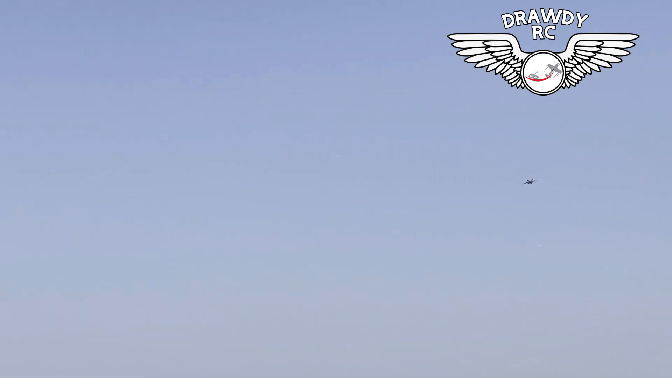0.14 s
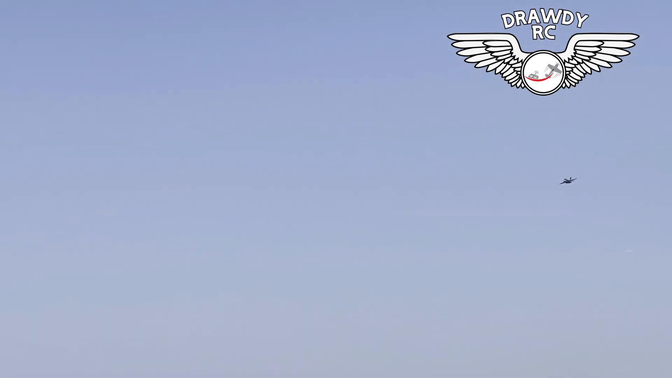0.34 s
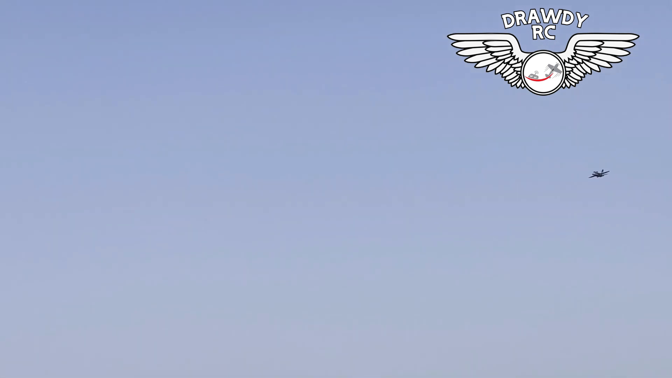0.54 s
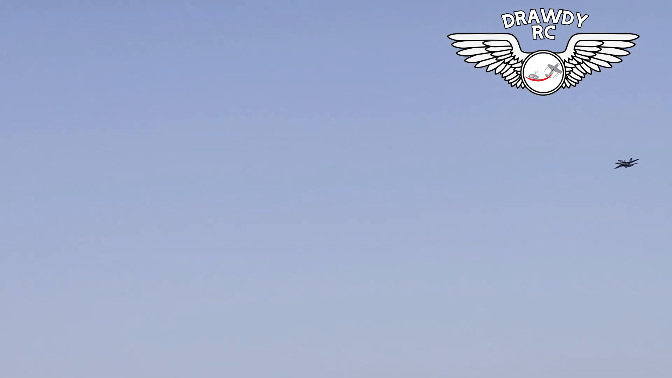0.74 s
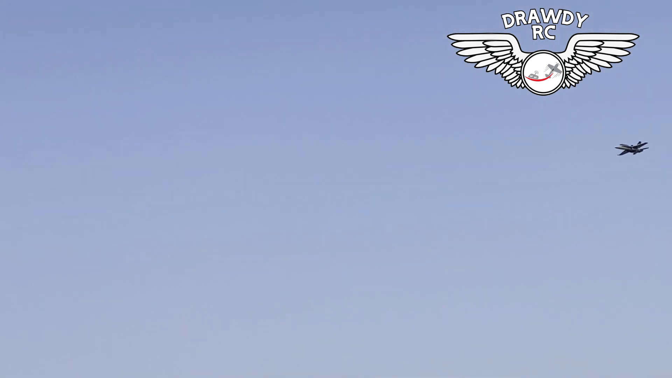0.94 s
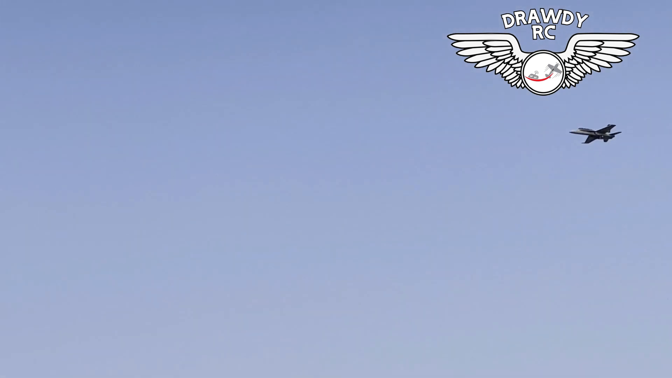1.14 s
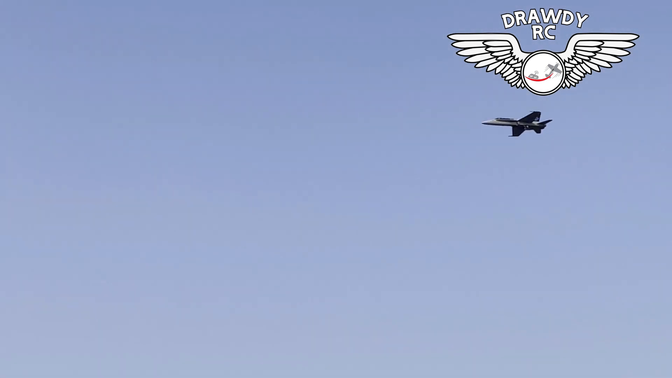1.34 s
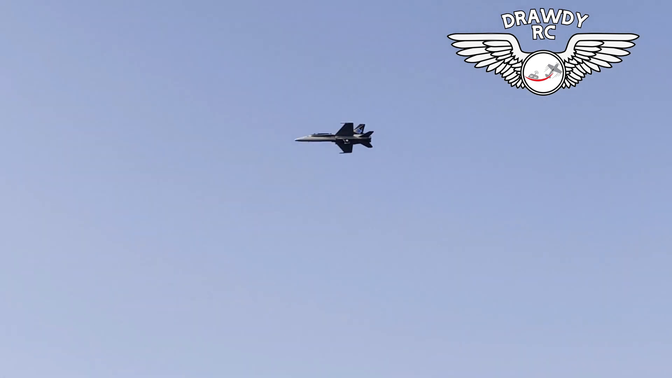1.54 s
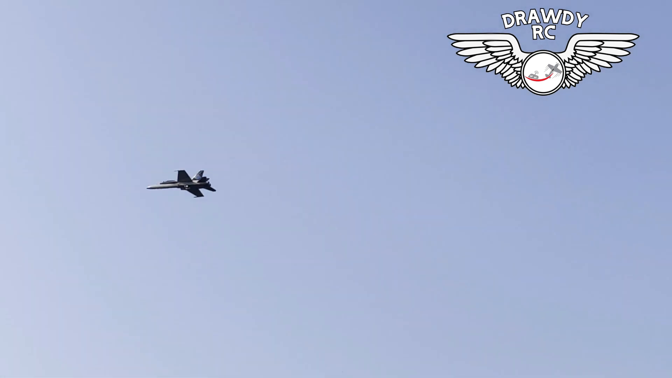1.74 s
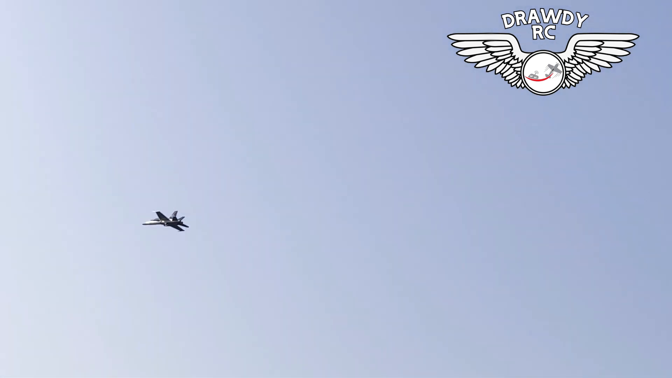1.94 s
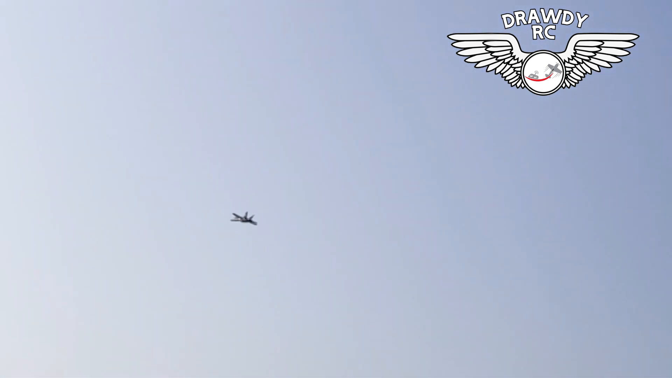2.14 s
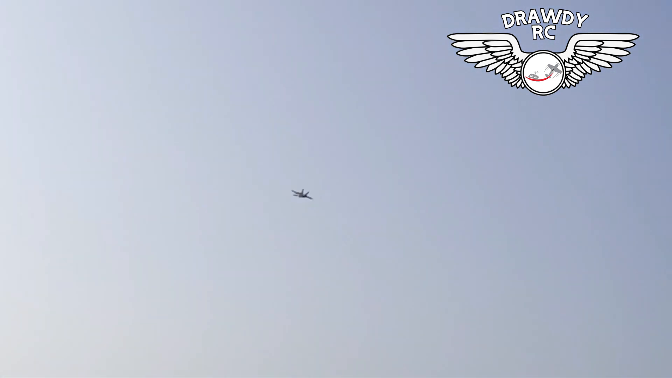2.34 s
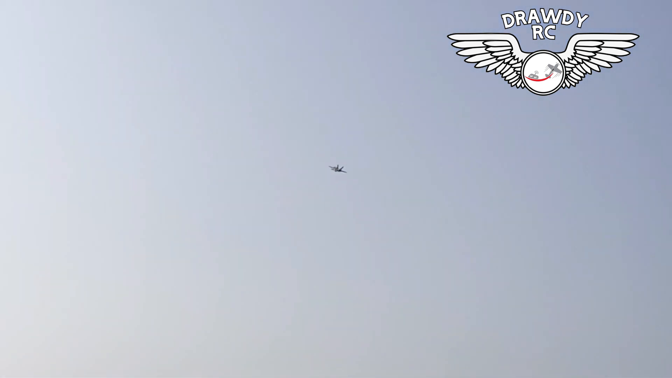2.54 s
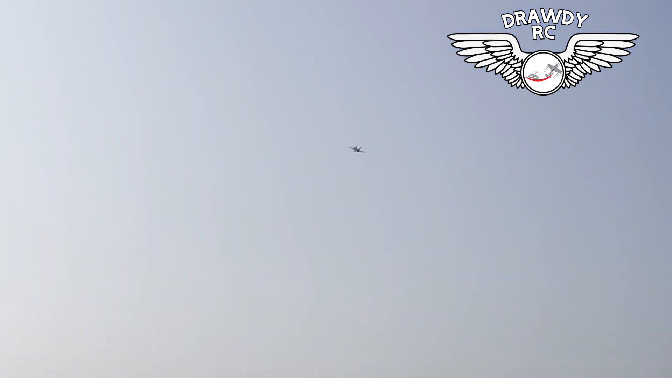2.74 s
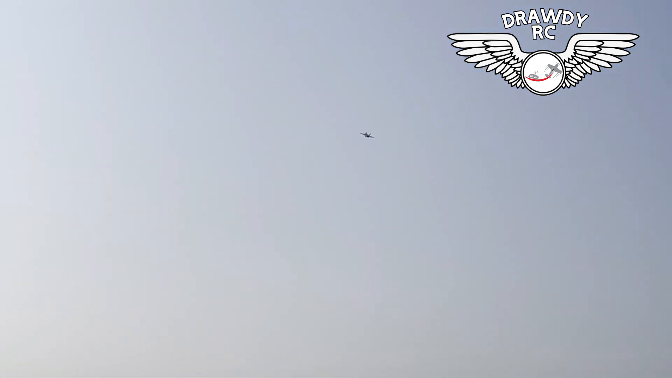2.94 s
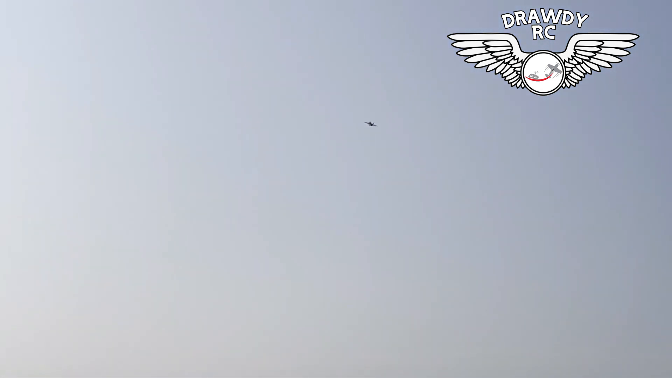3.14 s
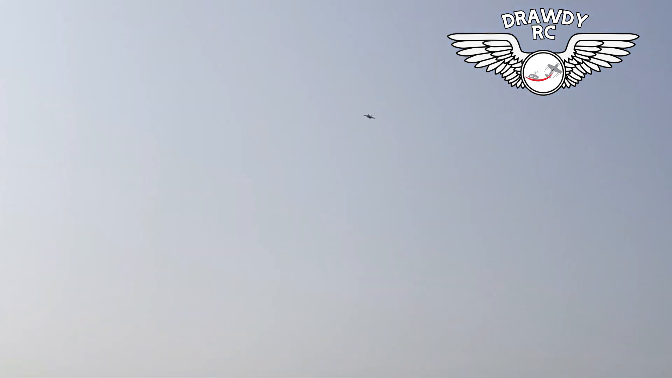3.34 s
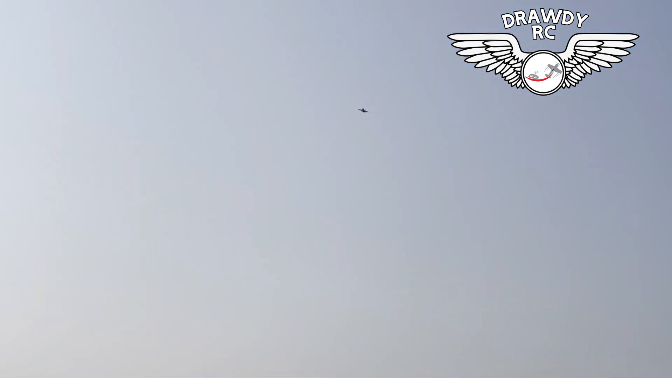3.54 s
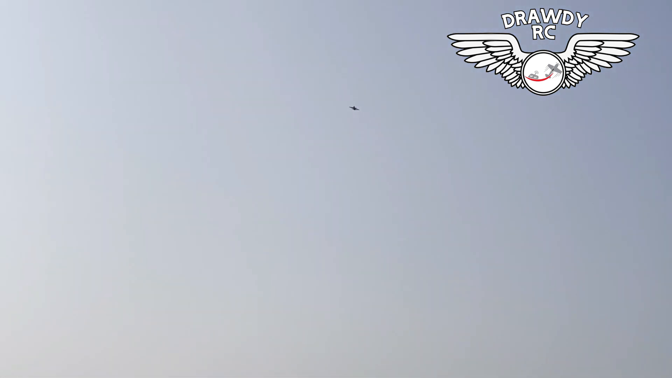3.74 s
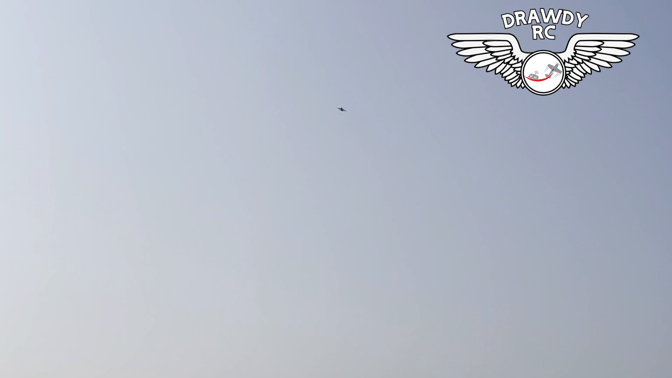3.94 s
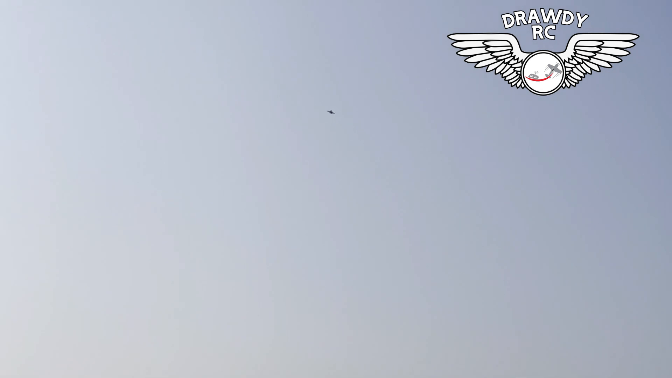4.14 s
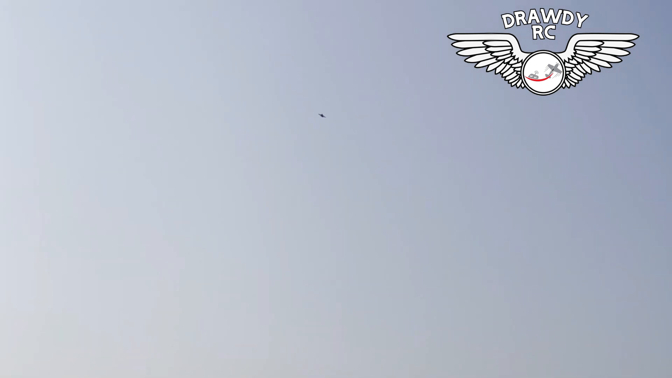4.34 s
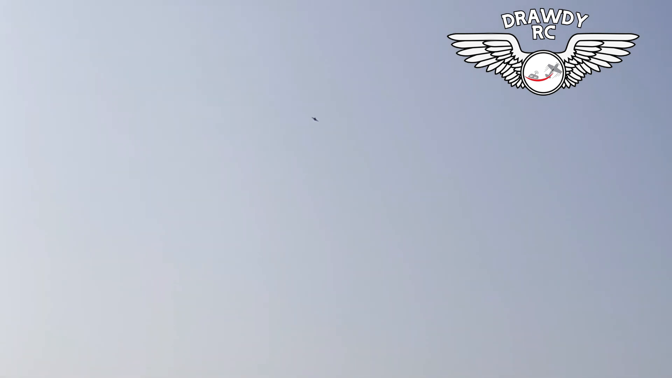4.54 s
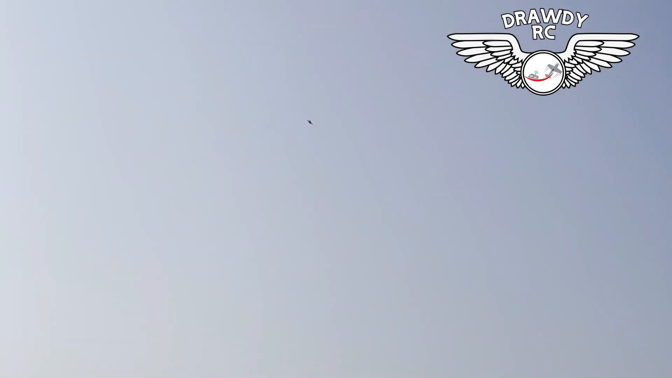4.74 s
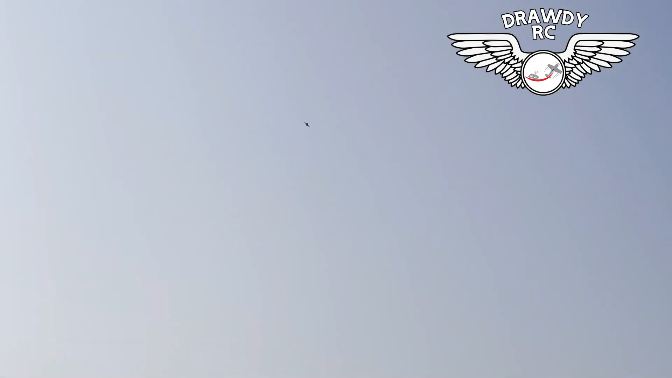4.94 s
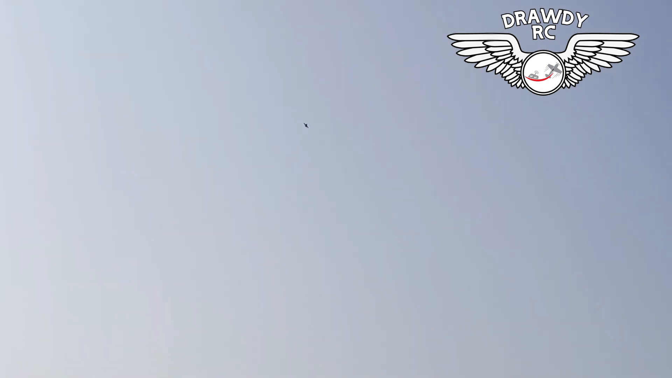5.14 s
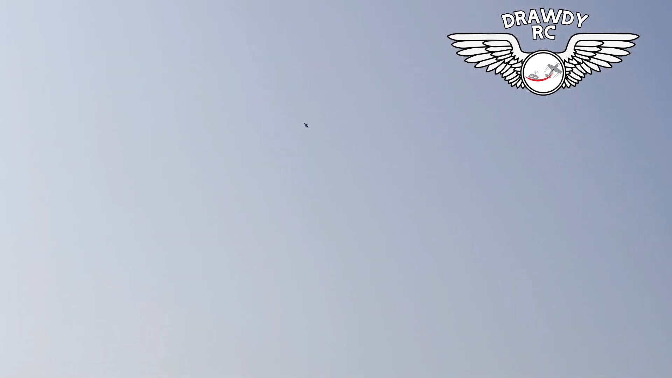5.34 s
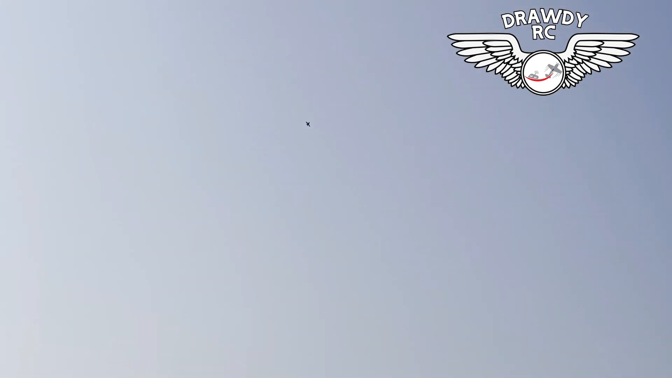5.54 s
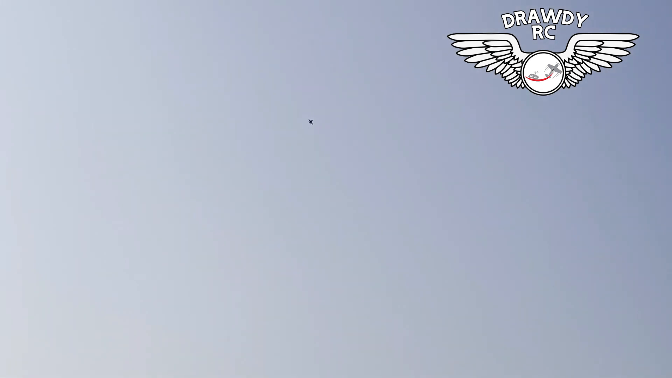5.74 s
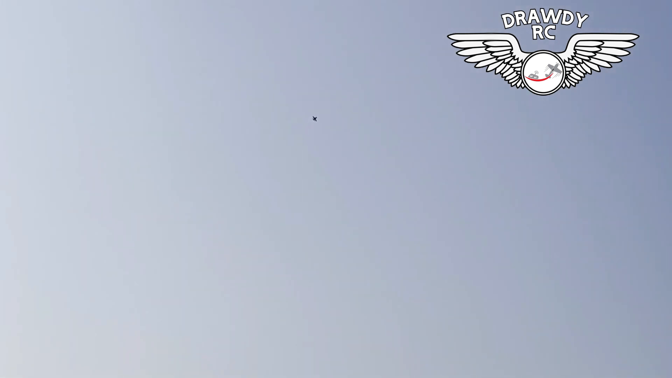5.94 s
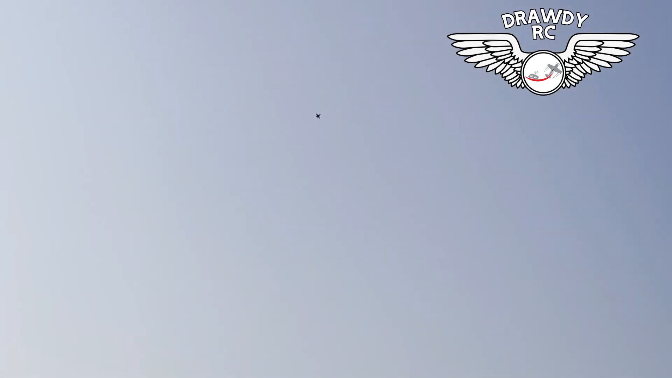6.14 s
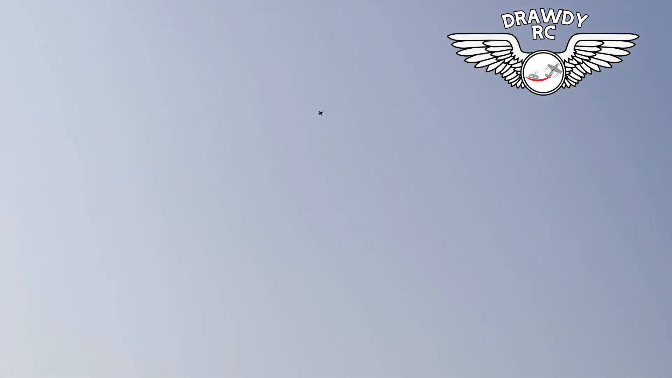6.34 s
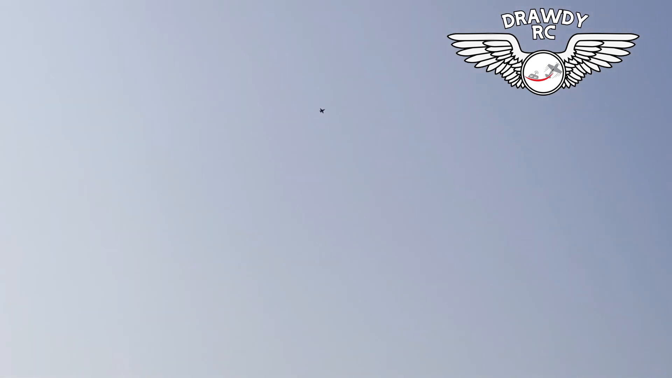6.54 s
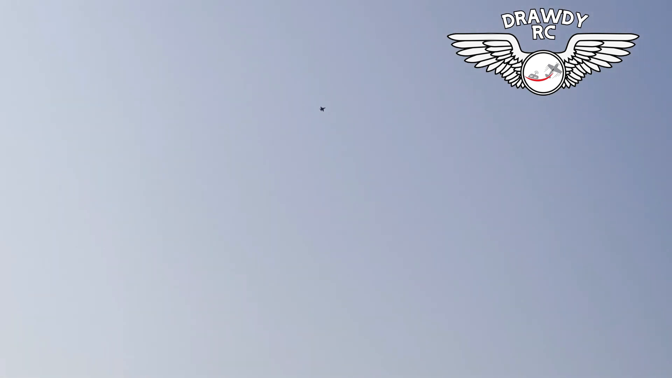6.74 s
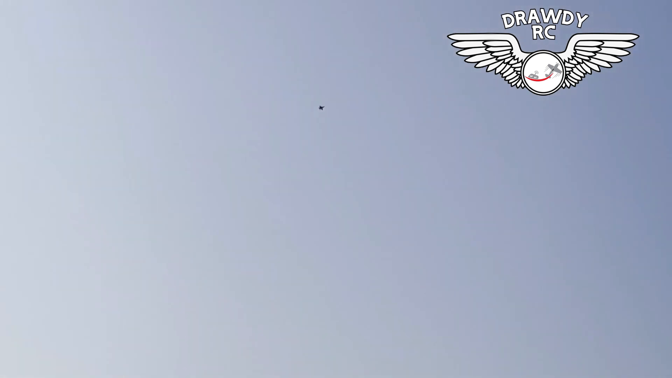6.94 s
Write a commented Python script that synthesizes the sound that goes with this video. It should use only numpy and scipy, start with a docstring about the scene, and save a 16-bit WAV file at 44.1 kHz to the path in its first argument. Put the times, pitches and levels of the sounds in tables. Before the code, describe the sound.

Outdoors on an open, breezy field, a small model jet approaches with a piercing fan whine and bright hissing rush. It passes close at about one and a half seconds, pitch sliding down, a hollow sweeping coloration from ground reflection running through it. Then it recedes, whine thin and wavering while the fan slowly winds up. Low wind thumps buffet the microphone, mostly early; a tiny bird trills twice over steady faint hiss.

```python
"""Whine and rush of a small model jet come in over windy ground, pass low and recede as the fan winds up.
Fan tones are sines and noise lines on the rotation; jet noise is shaped noise in bands. Both drop in
pitch by Doppler shift, and a delayed ground echo sweeps a comb through them.
Wind is gusted low noise. A small bird trills twice once the jet is distant: chirps falling in pitch.
Steady microphone hiss lies beneath; two close ports give the stereo phase."""
import sys
import numpy as np
from scipy import signal
from scipy.fft import rfft, irfft, next_fast_len
from scipy.io import wavfile
from scipy.ndimage import map_coordinates

SR = 44100
rng = np.random.default_rng(int(sys.argv[2]) if len(sys.argv) > 2 else 0)


def put_to_file(sound):
    """Save the sound as 16-bit audio at rate SR, in the file named by the first command-line argument."""
    columns = np.atleast_2d(sound).T  # one column per channel
    safe = np.clip(columns, -1, 1)
    whole_steps = np.round(safe * 32767)
    wavfile.write(sys.argv[1], SR, whole_steps.astype(np.int16))


N = 308259
TIME = np.arange(N) / SR
BLADE_COUNT = 12
SOUND_M_PER_S, MIC_HEIGHT_M = 343, 1.5
# straight pass at steady speed; PASS_S is when the closest point is heard
PASS_S, CLOSEST_M, SPEED_M_PER_S = 1.604, 22.34, 52.48

# fan winding up: start_s, speed_turns_per_s
FAN_SPEED = [(0, 436.5), (1.1, 436), (2.2, 435.8), (3.5, 441.7), (4, 445.1), (6, 457.4), (6.99, 468.6)]
# wavering of the distant jet: start_s, level_db
WAVER = [(0, 0), (3.2, 0), (3.6, -1.8), (3.95, -.8), (4.22, -4), (4.7, 1.3), (5.2, -2), (5.55, .2),
         (5.9, -1.8), (6.3, 1), (6.6, -1.3), (6.85, -4.5), (6.99, -4)]


def from_db(db):
    """Decibels to gain."""
    return 10 ** (np.asarray(db) / 20)


def rms_one(x):
    """Scale to unit rms."""
    return x / np.sqrt(np.mean(x ** 2) + 1e-20)


def in_time(rows):
    """Each column of a curve at every sample."""
    s, *columns = np.transpose(rows)
    return [np.interp(TIME, s, c) for c in columns]


def noise(colour, size=N):
    """Noise with a given spectrum, rms 1."""
    points, padded = np.array(colour), next_fast_len(size, True)
    hz = np.maximum(np.fft.rfftfreq(padded, 1 / SR), 1)
    gain = from_db(np.interp(np.log(hz), np.log(points[:, 0]), points[:, 1]))
    white = rng.standard_normal(padded)
    return rms_one(irfft(rfft(white) * gain, padded)[:size])


def drift(corner_hz):
    """Slow random wander, rms 1: two-pole low-passed noise at SR / 20."""
    r = np.exp(-2 * np.pi * corner_hz * 20 / SR)
    settle = 4000
    white = rng.standard_normal(N // 20 + settle + 2)
    slow = signal.lfilter([1], [1, -2 * r, r * r], white)[settle:]
    return np.interp(np.arange(N) / 20, np.arange(len(slow)), rms_one(slow))


def band(x, low_hz, high_hz, order=8):
    """Zero-phase band-pass as a difference of two low-passes, rms 1."""
    size = next_fast_len(N, True)
    hz = np.fft.rfftfreq(size, 1 / SR)
    under_low, under_high = (1 / (1 + (hz / edge) ** (2 * order)) for edge in (low_hz, high_hz))
    return rms_one(irfft(rfft(x, size) * (under_high - under_low), size)[:N])


def read_at(x, position):
    """Read a signal between its samples."""
    return map_coordinates(x, [position], order=3, mode="mirror")


def delayed(x, lag_s):
    """The signal lag_s later."""
    return read_at(x, (TIME - lag_s) * SR)


def over_ground(x, lag_s, echo):
    """Direct sound plus its weaker bounce off the field, kept near constant power."""
    return (x + echo * delayed(x, lag_s)) / np.sqrt(1 + echo ** 2)


def jet():
    """Motion sets Doppler shift; path difference sets the ground echo's lag, longest near overhead."""
    # start_s, height_m (used for the echo lag only)
    height_curve = [(0, 27.6), (.4, 22.2), (.8, 17.6), (1, 15.85), (1.3, 14.1), (1.6, 13.15), (1.95, 12.9),
                    (2.2, 13.7), (2.45, 15.2), (3, 22), (3.5, 30.2), (4, 40.2), (4.8, 58.4), (5.5, 78.3),
                    (6.2, 96.9), (6.99, 121.4)]
    distance_m, bearing_deg = flight()
    turns_per_s, = in_time(FAN_SPEED)
    height_m, = in_time(height_curve)
    mach = SPEED_M_PER_S / SOUND_M_PER_S
    blade_hz = BLADE_COUNT * turns_per_s / (1 - mach * np.cos(np.radians(bearing_deg)))
    lag_s = 2 * MIC_HEIGHT_M * height_m / distance_m / SOUND_M_PER_S
    path = blade_hz, distance_m, bearing_deg, lag_s
    return jet_noise(*path) + fan(*path)


def flight():
    """Distance (m) and angle from the nose (degrees) at which the sound now arriving left the jet."""
    mach = SPEED_M_PER_S / SOUND_M_PER_S
    along = SPEED_M_PER_S * (TIME - PASS_S) + mach * CLOSEST_M
    slant = np.sqrt(along ** 2 + (1 - mach ** 2) * CLOSEST_M ** 2)
    distance_m = (slant - mach * along) / (1 - mach ** 2)
    return distance_m, np.degrees(np.arccos(mach - along / distance_m))


def jet_noise(blade_hz, distance_m, bearing_deg, lag_s):
    """Turbulence of exhaust and fan, its pitch following the blades; moving air makes it flutter."""
    # spectrum near the closest point, shaping each band from within: pitch_hz, relative_level_db
    jet_colour = [(120, -6), (300, -5), (600, -3), (1000, 1), (1400, 0.5), (2200, 0.5), (3100, -2),
                  (4200, 1), (5200, 5), (6300, 6.5), (8000, 4), (10500, 3.5), (12000, 3.5), (15000, -9)]
    # columns of the patterns below: angle_from_nose_deg
    directions = [13, 25, 45, 95, 140, 158]
    # band level at the closest distance before air loss: one level_db per direction
    low_roar_db = [-49, -43, -37.5, -39, -44, -43.5]
    roar_db = [-27.5, -27.1, -27.5, -29.7, -31.4, -31.8]
    rush_db = [-25.5, -22.8, -28.2, -31.5, -29.6, -30.7]
    treble_db = [-21.6, -23.3, -26.3, -30.8, -32.6, -33.2]
    sizzle_db = [-33.3, -27.8, -28.5, -34.5, -29.5, -40.7]
    spray_pattern_db = [-29.7, -28, -30.2, -33, -27.7, -33.2]
    waver_db, = in_time(WAVER)
    path_db = waver_db + 20 * np.log10(CLOSEST_M / distance_m)

    def heard_db(pattern_db, air_db_per_m):
        """A band's level after direction, spreading and loss on the way."""
        return np.interp(bearing_deg, directions, pattern_db) + path_db - air_db_per_m * distance_m

    def layer(level_db, band_noise, echo):
        """One band at its level, with its ground echo."""
        return from_db(level_db) * over_ground(band_noise, lag_s, echo)

    emitted = np.cumsum(blade_hz / 5300)  # unshifted at a 5300 Hz blade tone
    source = read_at(noise(jet_colour, size=N + N // 4), emitted)
    # short reflections close to the microphone make the colour uneven
    source = source + .13 * delayed(source, .0015) + .1 * delayed(source, .00195)
    # grass mirrors treble at grazing angles and scatters it when the jet is overhead
    grazing = lag_s.min() / lag_s

    low_roar = layer(heard_db(low_roar_db, .035), band(source, 220, 400, order=4), echo=.78)
    roar = layer(heard_db(roar_db, .027) + .22 * drift(10),
                 band(source, 400, 1307, order=4), echo=.78)
    rush = layer(heard_db(rush_db, .013) + .86 * drift(5.9),
                 band(source, 1340, 4054), echo=.92 * grazing)
    treble = layer(heard_db(treble_db, .007) + 1.2 * drift(8),
                   band(source, 4170, 6650), echo=.9 * grazing)
    sizzle = layer(heard_db(sizzle_db, .002) + 1.2 * drift(7.5),
                   band(source, 6500, 8940, order=12), echo=.5 * grazing ** 2)
    spray_db = heard_db(spray_pattern_db, .035)
    spray = layer(spray_db + 1.2 * drift(10),
                  band(source, 8780, 11110, order=24), echo=.62 * grazing ** 2)
    # air absorbs the very top, so it fades faster than the spray
    near_db = spray_db - spray_db.max()
    top = from_db(-38.5 + 2.2 * near_db) * band(source, 10000, 12760, order=24)
    return low_roar + roar + rush + treble + sizzle + spray + top


def fan(blade_hz, distance_m, bearing_deg, lag_s):
    """Imbalance hums once a turn, blades and motor whistle, and the duct rings with the turbulence."""
    # lobes at the closest distance, before wind-up and wavering: angle_from_nose_deg, level_db
    hum_lobes = [(13, -40), (19, -29), (60, -24), (85, -33.5), (102, -26.5), (124, -33), (140, -45),
                 (160, -47), (170, -53)]
    whine_lobes = [(13, -33), (17, -28), (23, -28), (28, -19), (38, -30), (70, -31), (110, -35), (136, -32),
                   (156, -39), (163, -46), (172, -43)]
    motor_lobes = [(13, -49), (23, -38), (29, -44), (38, -35), (70, -34), (115, -52), (138, -40),
                   (156, -46), (168, -38)]
    duct_lobes = [(13, -37), (26, -32), (35, -26.5), (80, -31), (115, -31.5), (148, -40), (160, -51),
                  (175, -70)]
    # rotation_multiple, relative_level_db
    blade_orders = [(12, -0.5), (24, -31)]
    motor_orders = [(5, -2), (7, -10.5), (10, -24)]
    # resonances: rotation_multiple, half_width_hz, relative_level_db
    duct_modes = [(2.19, 64, 0), (4.9, 260, -10), (8.7, 39, -13)]
    hum_rise_db, whine_rise_db = .44, .42  # per turn per s of wind-up
    whine_waver_depth = 1.5  # against that of the jet noise

    lobes = hum_lobes, whine_lobes, motor_lobes, duct_lobes
    hum_db, whine_db, motor_db, duct_db = (np.interp(bearing_deg, *np.transpose(x)) for x in lobes)
    turns_per_s, = in_time(FAN_SPEED)
    waver_db, = in_time(WAVER)
    wound_up = turns_per_s - turns_per_s[0]
    heard_turns_per_s = blade_hz / BLADE_COUNT * (1 + .00038 * drift(19.5))
    angle = 2 * np.pi * np.cumsum(heard_turns_per_s) / SR

    hum = from_db(hum_db + hum_rise_db * wound_up) * np.sqrt(2) * np.sin(angle)
    # blades chopping the inflow spread a skirt of noise round their tone
    skirt = from_db(-8.5) * noisy_line(BLADE_COUNT * angle, half_width_hz=300)
    whine_gain = from_db(whine_db + whine_rise_db * wound_up + whine_waver_depth * waver_db)
    whine = whine_gain * (partials(angle, blade_orders, flutter_db=1.37) + skirt)
    motor = from_db(motor_db) * partials(angle, motor_orders, flutter_db=1.5)
    duct = sum(from_db(duct_db + db) * noisy_line(k * angle, width) for k, width, db in duct_modes)
    # tones swell and fade as the comb of the ground echo slides across them
    tones = over_ground(hum, lag_s, echo=.82) + over_ground(whine, lag_s, echo=.8)
    tones = tones + over_ground(motor + duct, lag_s, echo=.74)
    return tones * CLOSEST_M / distance_m


def partials(angle, orders, flutter_db):
    """Multiples of the rotation, each fluttering on its own."""
    return np.sqrt(2) * sum(from_db(db + flutter_db * drift(8.3)) * np.sin(k * angle) for k, db in orders)


def noisy_line(angle, half_width_hz):
    """A narrow band of noise that rides on a moving pitch, rms 1."""
    return rms_one(drift(half_width_hz) * np.sin(angle) + drift(half_width_hz) * np.cos(angle))


def wind():
    """Lumpy breeze and gusts, sharp ones brighter; eddies hit the two ports in opposite sign."""
    # spectra: pitch_hz, relative_level_db
    rumble_colour = [(15, -36), (28, -17), (42, -7), (62, -0.5), (100, -6.5), (160, -11.5), (260, -18),
                     (500, -37), (1500, -79)]
    buffet_colour = [(15, -38), (35, -12), (70, 1.5), (130, -3), (220, -9), (380, -30.5), (1500, -66),
                     (5000, -105)]
    eddy_colour = [(25, -22), (50, 4), (85, -3.5), (140, 2.5), (230, -1), (380, -10.5), (600, -23),
                   (1500, -50)]
    # slow swell of the breeze, before wander and rumble trim: start_s, level_db
    breeze = [(0, -45), (.4, -45), (1.15, -37), (1.42, -44), (1.8, -43), (2.3, -48), (3.1, -42), (3.7, -50),
              (5.1, -53), (5.7, -50), (6.4, -57.5), (6.99, -55)]
    # slow swell of the wind eddies, before wander: start_s, level_db
    eddy_curve = [(0, -84), (1.5, -80), (2.5, -59), (2.95, -44), (4, -48), (5.4, -55), (6.2, -51),
                  (6.99, -53)]
    # gusts before soft/sharp split: centre_s, level_db, half_length_s, sharpness_0_to_1
    gusts = [(0.202, -34.3, 0.029, 0.0), (0.27, -26.8, 0.03, 0.4), (0.365, -34.5, 0.014, 0.0),
             (0.485, -33.8, 0.043, 0.0), (0.602, -34.3, 0.05, 0.2), (0.692, -26.1, 0.023, 0.6),
             (0.833, -28.0, 0.049, 0.3), (0.935, -32.1, 0.018, 0.0), (1.055, -28.4, 0.043, 0.2),
             (1.168, -25.5, 0.021, 0.1), (1.253, -28.7, 0.02, 0.8), (1.566, -32.4, 0.05, 0.0),
             (1.745, -24.1, 0.05, 0.6), (2.008, -28.0, 0.029, 0.6), (2.695, -38.5, 0.027, 0.0),
             (2.92, -36.4, 0.012, 0.0), (3.169, -37.8, 0.012, 0.0), (3.415, -41.0, 0.028, 0.0),
             (3.51, -36.8, 0.012, 0.2), (3.908, -39.2, 0.012, 0.0), (4.051, -39.9, 0.05, 0.1),
             (4.435, -46.5, 0.05, 0.0), (4.696, -37.0, 0.022, 0.5), (4.804, -38.9, 0.014, 0.6),
             (5.616, -43.4, 0.019, 0.2), (5.82, -33.1, 0.012, 0.5), (5.875, -40.7, 0.05, 0.0),
             (6.219, -37.5, 0.023, 0.5), (6.9, -48.3, 0.012, 0.0)]
    buffet_share = .55  # length of the bright buffet, against that of its gust
    gust_eddy_db = -26  # eddies of a gust, against its power envelope

    breeze_db, = in_time(breeze)
    eddy_db, = in_time(eddy_curve)
    soft_power, sharp_power = 0, 0
    for s, db, half_s, sharpness in gusts:
        power, age = from_db(db) ** 2, (TIME - s) / half_s
        soft_power = soft_power + (1 - sharpness) * power * np.exp(-age ** 2)
        # a shorter buffet is stronger, keeping its energy
        buffet = np.exp(-(age / buffet_share) ** 2) / buffet_share
        sharp_power = sharp_power + sharpness * power * buffet
    breeze_power = from_db(breeze_db + 1.8 * drift(12)) ** 2
    rumble = from_db(-1) * np.sqrt(breeze_power + soft_power) * noise(rumble_colour)
    buffets = np.sqrt(sharp_power) * noise(buffet_colour)
    gust_eddies = from_db(gust_eddy_db) * np.sqrt(soft_power + sharp_power)
    eddies = (from_db(eddy_db + 1.8 * drift(9)) + gust_eddies) * noise(eddy_colour)
    return rumble + buffets + eddies * [[1], [-1]]


def bird(chirps_per_s=95, uneven=.1):
    """A buzzy trill of tiny chirps, each falling in pitch, at an uneven rate."""
    # level is before swell and flutter: start_s, length_s, level_db, centre_hz, sweep_hz
    trills = [(4.03, 0.18, -57, 7460, 700), (5.79, .23, -53, 7400, 1500)]
    out = np.zeros(N)
    cycle = np.cumsum(chirps_per_s * (1 + uneven * drift(37))) / SR % 1
    for s, length_s, db, centre_hz, sweep_hz in trills:
        arch = np.sin(np.pi * np.clip((TIME - s) / length_s, 0, 1))
        swell = np.sqrt(np.maximum(arch, 0))
        pitch_hz = centre_hz + sweep_hz * (.5 - cycle)
        chirps = np.sin(np.pi * cycle) ** 2 * np.sin(2 * np.pi * np.cumsum(pitch_hz) / SR)
        out += from_db(db + 3.9 * drift(50)) * swell * rms_one(chirps)
    return out


def field_scatter(flyby):
    """A faint late copy of the jet off the field, opposite in sign at the two ports."""
    return from_db(-18) * delayed(flyby, .023) * [[1], [-1]]


def microphone_hiss():
    """Steady coloured noise of the microphone."""
    # pitch_hz, relative_level_db
    hiss_colour = [(100, 13), (500, 7.5), (2000, -36), (8500, -42), (9700, 17), (10500, 14), (11000, 14),
                   (11500, -97), (14000, -53)]
    return from_db(-54.5) * noise(hiss_colour)


def ports(x):
    """Two close ports hear the same level with a phase difference that depends on frequency."""
    # pitch_hz, left_lead_rad
    port_phase = [(0, 0), (1400, -.3), (2200, 0), (3100, .6), (5000, .5), (5900, 0), (7500, 0), (7900, .35),
                  (8500, 0), (8800, 0), (9400, -1.8), (10250, -3.14), (11700, -6.2), (13000, -6.3)]
    size = next_fast_len(N + SR // 10, True)
    phase = np.interp(np.fft.rfftfreq(size, 1 / SR), *np.transpose(port_phase))
    spectrum = rfft(x, size)
    return np.array([irfft(spectrum * np.exp(1j * side * phase), size)[:N] for side in (.5, -.5)])


def scene():
    """Jet, bird and hiss through the ports, a little scatter from the field, and the wind."""
    flyby = jet()
    return ports(flyby + bird() + microphone_hiss()) + field_scatter(flyby) + wind()


def record(dry):
    """Steep elliptic low-pass at 13 kHz: 0.2 dB ripple, 80 dB stop band."""
    return signal.sosfilt(signal.ellip(10, .2, 80, 13000, fs=SR, output="sos"), dry)


dry = scene()
out = record(dry)
put_to_file(out)
```